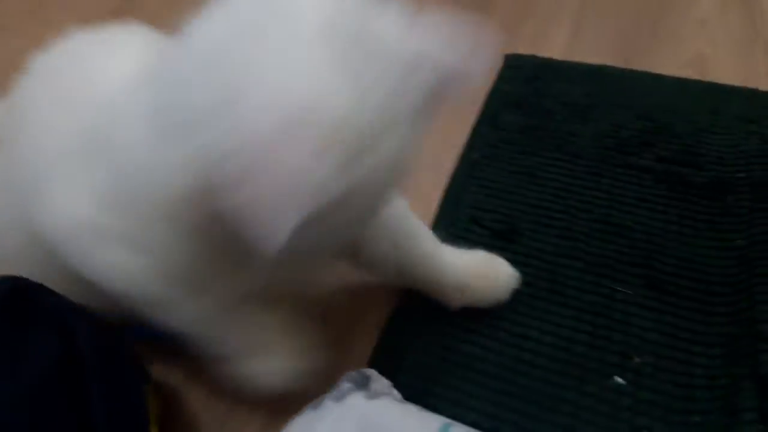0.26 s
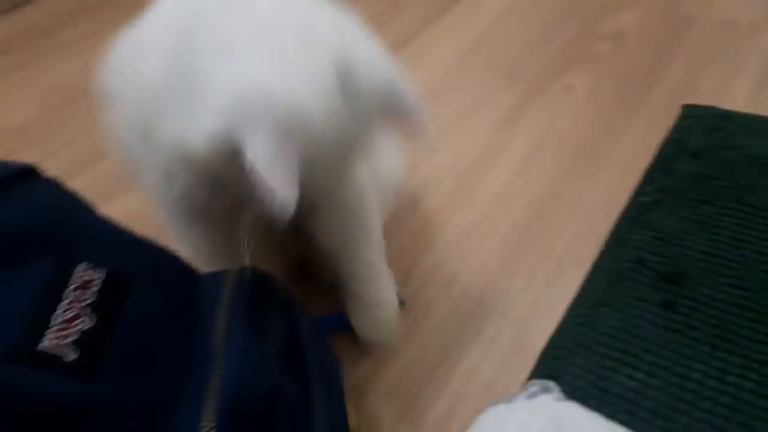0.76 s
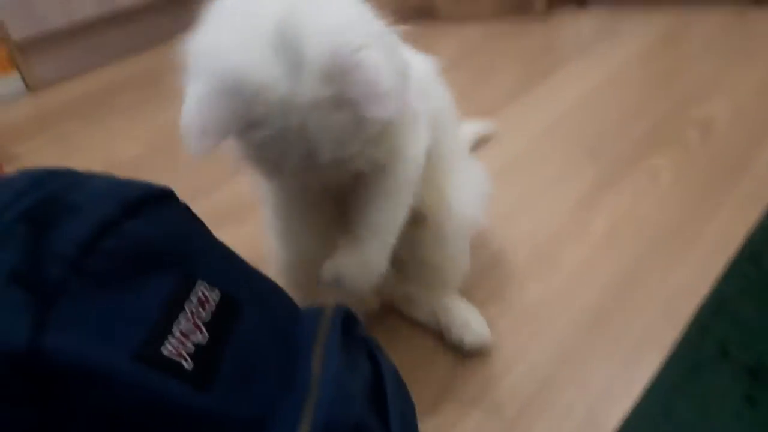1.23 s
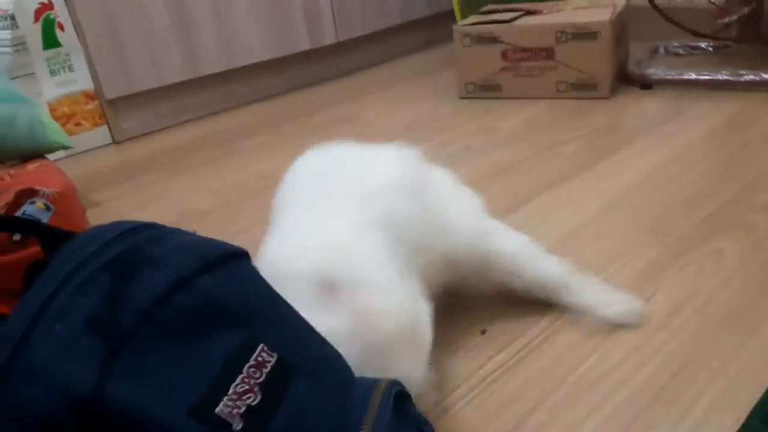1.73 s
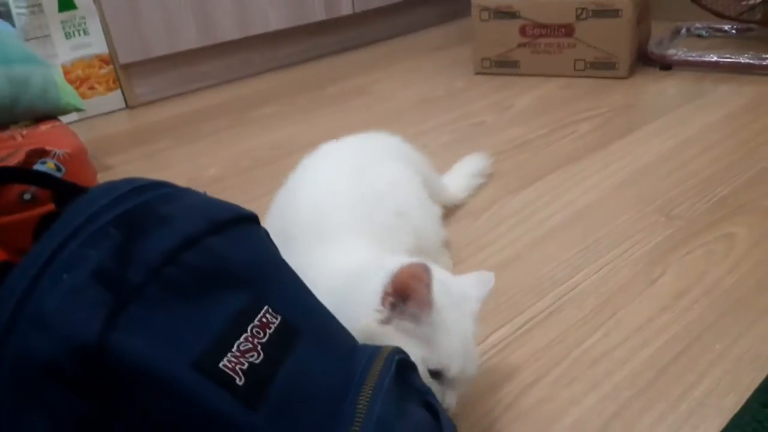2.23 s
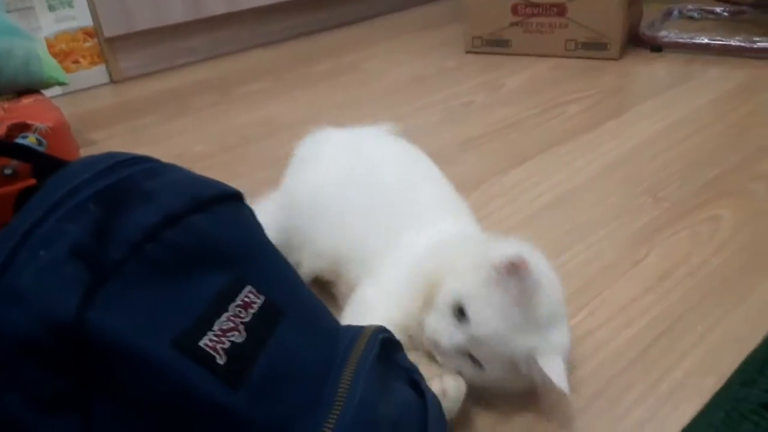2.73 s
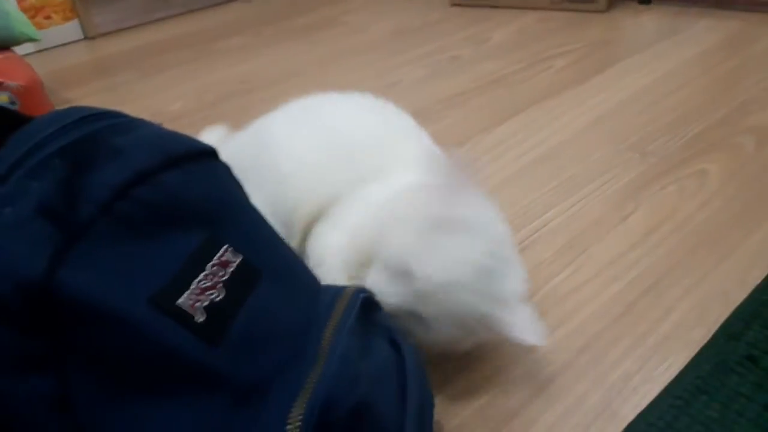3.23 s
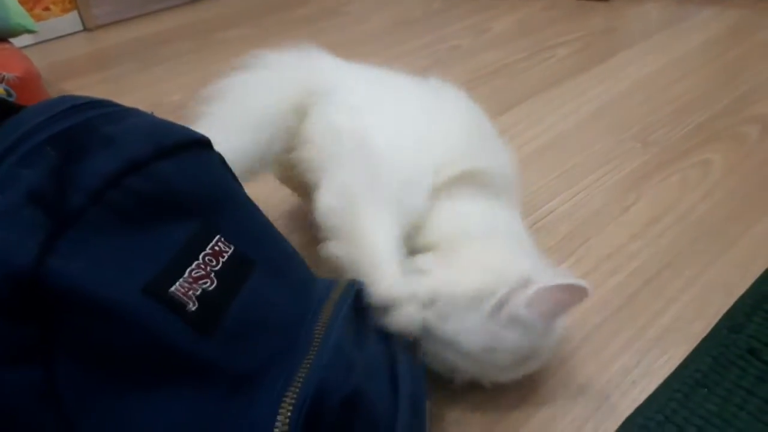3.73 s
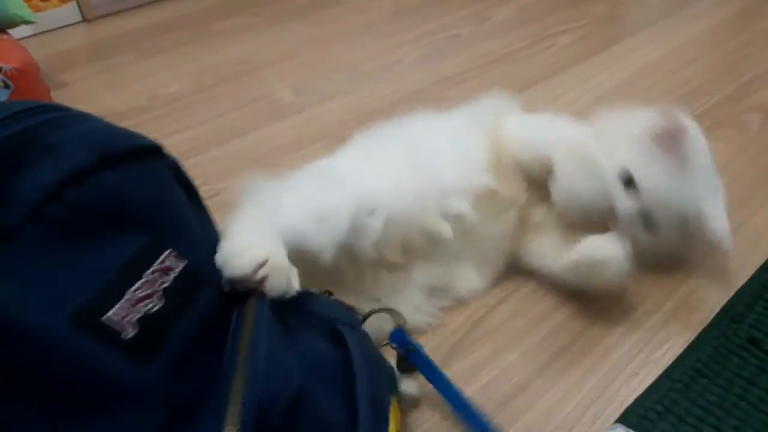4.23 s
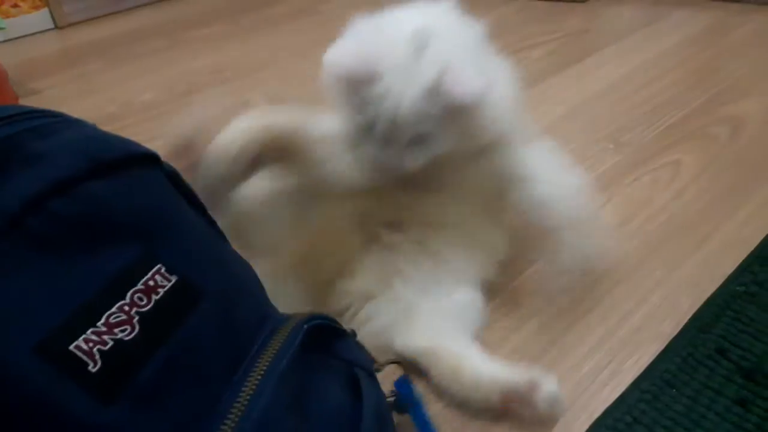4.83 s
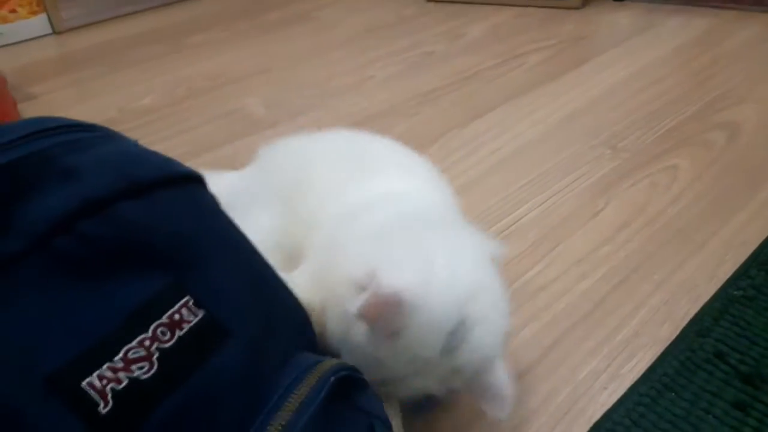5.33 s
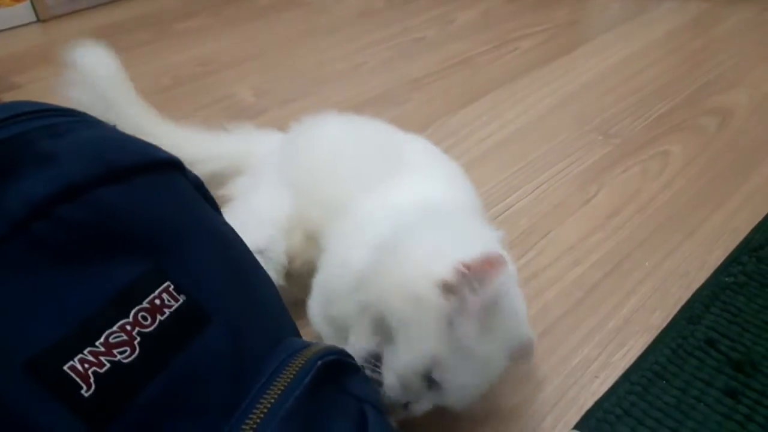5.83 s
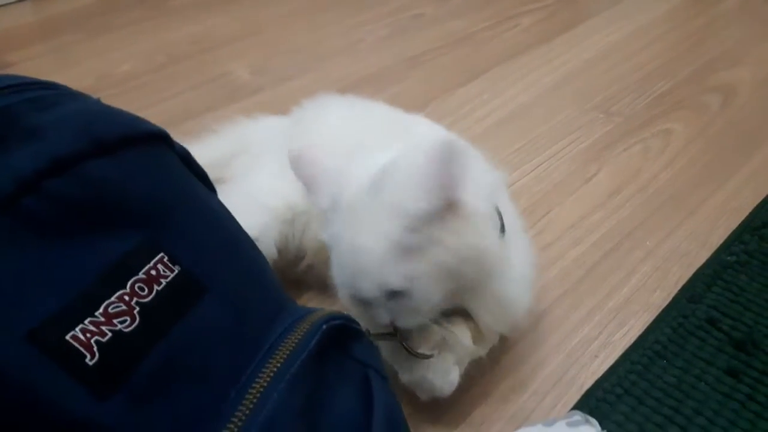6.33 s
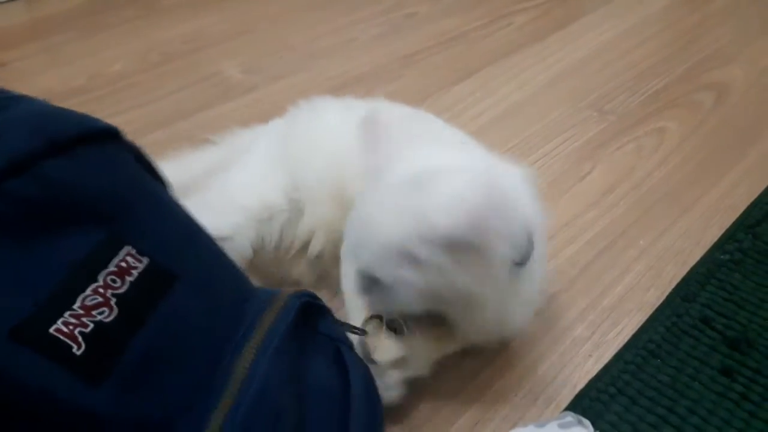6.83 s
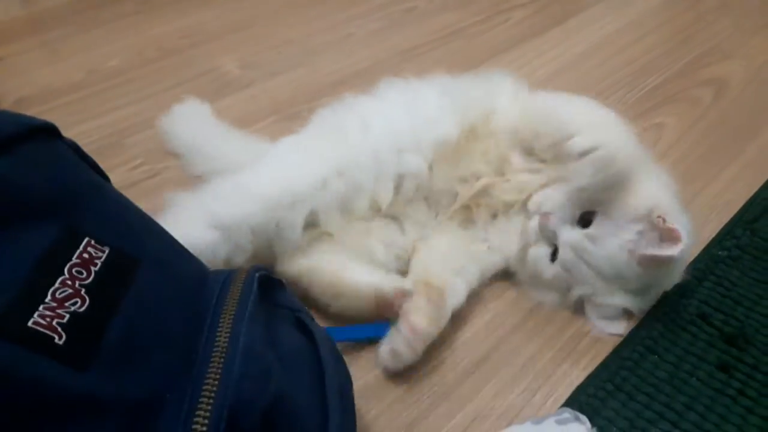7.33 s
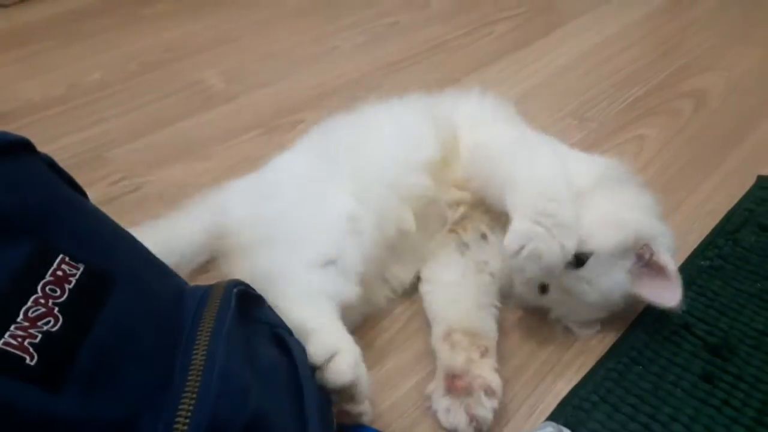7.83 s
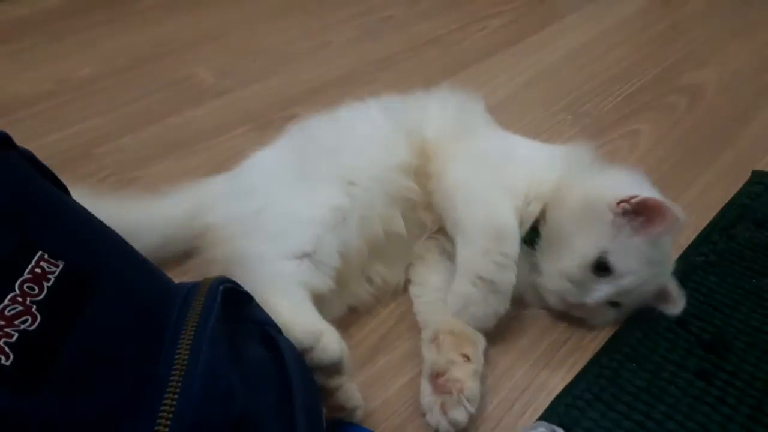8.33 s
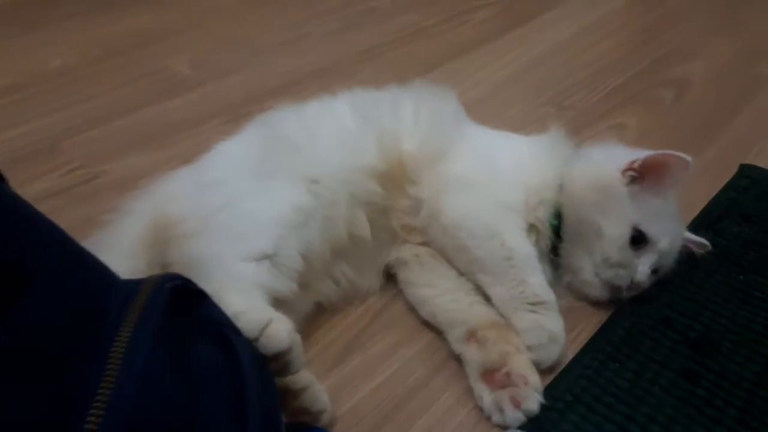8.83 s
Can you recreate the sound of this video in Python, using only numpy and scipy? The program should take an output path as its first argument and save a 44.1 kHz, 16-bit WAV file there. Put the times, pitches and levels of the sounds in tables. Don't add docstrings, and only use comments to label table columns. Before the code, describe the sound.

Close phone pickup in a small furnished room: a low humming appliance and faint hiss, then a kitten's thin, bright bell rattling irregularly. Claws tick and snag in fabric, a metal clasp clinks, fur scuffs and paws slide and thump the boards. Busy scrambles alternate with calm gaps; the loudest is a woody clack before three seconds. Two firm knocks follow the final loud jingle, then it settles.

```python
import sys
import numpy as np
from scipy import signal
from scipy.fft import rfft, irfft, next_fast_len
from scipy.io import wavfile
from scipy.ndimage import uniform_filter1d

SR = 44100
rng = np.random.default_rng(int(sys.argv[2]) if len(sys.argv) > 2 else 0)


def volts_from_db(level):
    exponent = np.asarray(level, float) / 20
    return 10 ** exponent


def persist_wave(psi):
    counts = np.round(np.clip(psi, -1, 1) * 32767).astype(np.int16)
    wavfile.write(sys.argv[1], SR, np.atleast_2d(counts).T)


N = 399987


def bell():
    # start in seconds, peak in dB, upper partials in relative dB, tick in relative dB.
    blows = [(0.7456, -50, -18, 8), (0.7979, -42.5, -15, 3.5), (0.901, -46, -11, 3),
             (1.068, -44, -22, -19.5), (1.158, -39, -19, -15), (1.1613, -49, -21.5, -15),
             (1.2785, -35, -15.5, -8), (1.468, -39.5, -28, -13), (1.5925, -40.5, -14, -16),
             (1.794, -41.5, -36, 4), (1.832, -40.5, -11.5, 5), (1.909, -31.5, -25, -1.5),
             (2.5846, -52, -6, -6), (2.6444, -48.5, -18, -11), (2.7924, -31, -14.5, -14),
             (3.3008, -50, -9, -0.5), (4.4171, -51, -8, -15.5), (4.712, -51, -18, -14),
             (4.861, -39.5, -9.5, -7), (5.0794, -23.5, -15, -9), (5.2764, -45, -20, 3),
             (5.3437, -33, -15, -11), (5.5627, -38.5, -29.5, -21), (5.6575, -42.5, -15, -11),
             (5.7916, -38, -13.5, -2), (5.9244, -36.5, -28, -3), (6.2981, -42.5, -20, -15.5),
             (6.4604, -48.5, -31.5, -16.5), (7.042, -35.5, -6, -7), (7.104, -43, -20, -16),
             (7.1074, -20, -20, -16), (7.871, -59.5, 1, 4)]
    # start in seconds, peak in dB.
    rebounds = [(0.6535, -58), (0.724, -57), (0.732, -50.5), (0.779, -53), (0.886, -56), (0.929, -49),
                (0.9634, -54), (1.1019, -47), (1.26, -49), (1.312, -47.5), (1.3428, -47), (1.371, -42),
                (1.4134, -43), (1.432, -54), (1.4872, -43), (1.51, -56.5), (1.5678, -47), (1.7379, -61),
                (2.6994, -69), (2.7609, -54.5), (3.094, -53), (3.2147, -54), (3.24, -51.5), (3.317, -46),
                (3.3455, -50.5), (4.119, -54), (4.2483, -47), (4.3889, -54.5), (4.6369, -55), (4.6995, -50),
                (4.8413, -54), (5.0027, -42), (5.12, -49), (5.267, -46.5), (5.313, -53), (5.2963, -40),
                (5.5476, -51), (5.5747, -46.5), (5.613, -48), (5.6254, -46), (5.6446, -46.5), (5.7063, -56),
                (5.7836, -49), (5.855, -59), (5.884, -58), (5.9509, -44.5), (5.9909, -50.5), (6.2106, -57),
                (6.9671, -53), (6.985, -54), (7.0753, -44), (7.219, -39), (7.269, -56), (7.34, -58)]
    # start in seconds, peak in dB.
    glances = [(0.7342, -59), (0.8044, -63), (1.1792, -42), (1.5284, -45), (1.5878, -54.5), (2.7921, -53),
               (3.3174, -51.5), (3.3844, -52), (4.8424, -49), (4.8594, -46), (5.0844, -40), (5.2794, -52),
               (5.2974, -46.5), (5.6644, -59), (5.8044, -59), (5.9244, -60.5), (5.9499, -49),
               (5.9914, -66.5), (7.0414, -51), (7.0614, -54), (7.1048, -37), (7.3038, -40.5),
               (7.855, -51.5), (7.8694, -61)]
    # start in seconds, length in seconds, blow level in dB, tick in relative dB.
    shakes = [(0.64, 0.016, -66, 16), (0.73, 0.079, -62.5, 36), (0.872, 0.035, -57, 20),
              (0.984, 0.32, -51, -12), (1.28, 0.147, -50, -16), (1.473, 0.138, -42.5, -16),
              (1.651, 0.46, -46.5, -8), (2.58, 0.26, -48, 9.5), (3.087, 0.054, -51, -15.5),
              (3.207, 0.18, -56.5, -8.5), (4.1, 0.059, -50, -4), (4.24, 0.043, -53.5, -8),
              (4.297, 0.25, -59, -4), (4.625, 0.18, -51, -1), (4.84, 0.053, -36.5, -12.5),
              (5.014, 0.032, -49, -10), (5.266, 0.059, -36, -6), (5.543, 0.091, -56, -19),
              (5.685, 0.035, -61, 9), (5.804, 0.062, -62, -8.5), (5.936, 0.046, -68.5, 0),
              (6.177, 0.045, -51, 0), (6.481, 0.062, -57, -5.5), (6.982, 0.18, -40, -15),
              (7.205, 0.022, -59, -5), (7.264, 0.105, -60, -16), (7.702, 0.033, -50.5, -14),
              (7.842, 0.058, -49.5, -13.5)]
    # frequency in Hz, level in dB, t60 in seconds.
    shell_modes = [(4750, -9, 0.027), (4763, -2.5, 0.045), (4817, -7, 0.025), (5040, -12, 0.016)]
    # frequency in Hz, level in dB, t60 in seconds.
    rim_modes = [(11285, 1.5, 0.06), (11530, 2, 0.055)]
    # frequency in Hz, level in dB, t60 in seconds.
    pellet_modes = [(5144, 4, 0.0029), (6413, 7, 0.0045), (7090, -3.5, 0.0033)]
    rebound_rim_db, rebound_tick_db = -24.5, -10.5
    tumbles_per_s, tumble_spread_db, tumble_rim_db, roll_db = 4, -7, -19, -5
    bounce_fade_s, bounces_per_s = 0.012, 450
    slit_waver_hz, slit_hz = 55, 4300

    light_blows = [(s, db, rebound_rim_db, rebound_tick_db) for s, db in rebounds]
    s, db, rim_db, tick_db = np.transpose(blows + light_blows)
    trains = np.zeros((4, N))
    trains[:, np.round(s * SR).astype(int)] = volts_from_db(db + np.array([0 * db, tick_db + 0.5, rim_db, rim_db - 9]))
    s, db = np.transpose(glances)
    trains[3, np.round(s * SR).astype(int)] = volts_from_db(db - 1.5)

    start, hold, shake_db, dry_db = np.transpose(shakes)
    shaken = spells(start, hold, shake_db, 900, 500)
    ticking = spells(start, hold, shake_db + dry_db, 900, 500)
    luck_db = tumble_spread_db * np.clip(rng.standard_normal((4, N)), -2, 2)
    tumbles = rng.random(N) < tumbles_per_s / SR
    rim_shaken = shaken + tumble_rim_db
    trains = trains + volts_from_db(np.array([shaken, ticking, rim_shaken, rim_shaken]) + luck_db) * tumbles

    unrest = signal.lfilter([1], [1, -np.exp(-1 / (bounce_fade_s * SR))], trains)
    unrest[0] += volts_from_db(shaken + roll_db)
    bounces = rng.standard_normal(trains.shape) * (rng.random(N) < bounces_per_s / SR)
    trains = trains + volts_from_db(-11.5) * unrest * bounces

    bodies = [shell_modes, pellet_modes, rim_modes[:1], rim_modes[1:]]
    shell, tick, *rims = (signal.oaconvolve(train, ring(body))[:N] for train, body in zip(trains, bodies))

    cover = wander(1500)
    bend = np.exp(2j * np.pi * np.cumsum(slit_waver_hz * cover) / SR)
    shell, rim = (signal.hilbert(note, next_fast_len(N))[:N] for note in (shell, sum(rims)))
    rings = (shell * bend + rim * bend ** 2).real + tick
    rings = rings * volts_from_db(3.2 * np.clip(wander(200), -3, 1) - 1)
    return above(rings, slit_hz, order=8)


def clasp():
    # start in seconds, peak in dB, frequency in Hz, t60 in seconds.
    clinks = [(1.069, -58, 9600, 0.095), (1.07, -58.5, 13200, .07), (1.098, -49, 13300, .07),
              (1.145, -23.5, 13400, 0.011), (1.17, -45, 7000, 0.06), (1.224, -32, 13200, .04),
              (1.232, -33, 13200, 0.065), (1.225, -41.5, 5770, 0.074), (1.254, -41, 13200, .07),
              (1.287, -36, 13300, .06), (1.288, -41, 10200, 0.033), (1.288, -35, 5900, 0.018),
              (1.342, -38, 9900, 0.027), (1.858, -65, 13400, .08), (2.757, -46.5, 5780, 0.053),
              (2.761, -47.5, 13200, 0.083), (4.396, -43.5, 10150, 0.028), (5.25, -58.5, 10100, 0.075),
              (5.564, -42.5, 1257, 0.052), (7.129, -48, 10070, 0.06), (7.129, -40, 3510, 0.023),
              (7.211, -41, 12900, 0.035), (7.222, -48, 3526, 0.023)]
    out = np.zeros(N)
    for s, db, hz, t60 in clinks:
        add(out, s, ring([(hz, db, t60), (hz * 0.994, db - 8.5, t60 * 0.7)]))
    return out


def claws(room):
    # start in seconds, peak in dB, centre in Hz.
    ticks = [(0.9732, -48.5, 13200), (1.144, -26.5, 13800), (1.2236, -44, 12700), (1.287, -24.5, 13300),
             (1.3707, -24, 11100), (1.395, -36, 13000), (1.4951, -36, 11400), (1.864, -24, 9000),
             (2.0113, -16, 9730), (2.5347, -40, 13700), (2.7568, -47.5, 5800), (2.851, -29.5, 13000),
             (2.885, -25, 13250), (3.3669, -31.5, 8900), (4.087, -38.5, 6300), (4.144, -37, 7950),
             (4.1807, -34, 15300), (4.2267, -27, 15400), (4.278, -33, 11300), (4.6165, -39, 8500),
             (4.7554, -42, 11350), (5.024, -29.5, 15000), (5.589, -46, 8230), (7.3252, -44.5, 7000),
             (6.2112, -40.5, 4470), (7.1, -30.5, 11470), (7.2203, -29.5, 13100), (7.2523, -23.5, 15600),
             (7.2974, -36, 5160), (7.489, -35, 12600)]
    # start in seconds, peak in dB, centre in Hz.
    snags = [(0.9264, -40, 11200), (0.9544, -59, 7220), (0.979, -37, 13700), (1.0001, -42, 12600),
             (1.1267, -30, 13300), (1.1677, -21.5, 13000), (1.2524, -32, 12950), (1.3409, -28, 13400),
             (1.4729, -36.5, 11300), (1.5214, -39.5, 11500), (1.547, -32, 11500), (1.5864, -42, 11590),
             (1.8101, -32.5, 6750), (3.3834, -50, 12900), (3.47, -50.5, 5500), (3.941, -38, 13490),
             (3.9516, -40, 12100), (3.9675, -37, 13030), (4.0083, -53, 14000), (4.0228, -42, 12700),
             (4.0262, -38, 11400), (4.0834, -33, 6610), (4.1001, -35, 5950), (4.1066, -34, 7700),
             (4.1924, -36, 13900), (4.2394, -25, 15700), (4.2511, -35.5, 11300), (4.3113, -32, 7560),
             (4.3184, -38.5, 7760), (4.3291, -32, 8000), (4.4404, -44, 6230), (4.4742, -43, 7520),
             (4.498, -43, 7620), (4.7904, -36, 15540), (4.8285, -50, 11500), (4.9392, -37.5, 15600),
             (5.0085, -49, 11600), (5.0315, -26, 15800), (5.239, -35, 5990), (5.4037, -30.5, 5860),
             (5.443, -29.5, 13500), (5.5632, -36, 5890), (5.7119, -37, 8300), (5.731, -44, 8420),
             (5.7454, -47, 12700), (6.2394, -57, 6980), (7.0374, -44.5, 11300), (7.0573, -34.5, 6810),
             (7.0626, -41, 11100), (7.085, -35, 11300), (7.211, -43.5, 13250), (7.305, -31.5, 11500),
             (7.3314, -33, 11500), (7.436, -44.5, 5740), (7.552, -41, 7530), (7.5946, -45, 6210)]
    snag_db = -6
    direct, spread = np.zeros(N), np.zeros(N)
    for s, db, hz in ticks + [(s, db + snag_db, hz) for s, db, hz in snags]:
        shape = causal([(hz / 6, -26), (hz / 6.6, -10), (hz, 0), (hz * 2, -6), (hz * 4, -20)], size=256)
        add(direct, s, volts_from_db(db + 4) * ragged(shape, 0.004))
        add(spread, s, volts_from_db(1.283 * db + 12.5) * shape)
    return direct + signal.fftconvolve(spread, room)[:N]


def strap(room):
    # start in seconds, peak in dB, frequency in Hz.
    taps = [(1.1342, -40, 1730), (1.1432, -42.5, 3090), (1.2232, -47.5, 3010), (1.2791, -46, 3280),
            (1.3698, -32, 1730), (1.3694, -38, 4070), (1.393, -50, 3530), (1.4721, -45, 3000),
            (1.522, -42, 2990), (1.5435, -36, 1410), (2.868, -8, 4113), (2.892, -17, 4200),
            (4.1892, -38, 1470), (4.2762, -43, 1270), (4.3097, -39, 1220), (4.8886, -48, 2450),
            (5.143, -27.5, 3330), (5.1635, -42, 3550), (5.253, -39, 3660), (7.295, -39.5, 3900),
            (7.3251, -34, 3130), (7.877, -58, 2970)]
    out = np.zeros(N)
    for s, db, hz in taps:
        note = ring([(hz, 0, 0.005)], size=600, rise_s=0.00043)
        add(out, s, volts_from_db(db) * ragged(note, 0.004))
    return out + volts_from_db(-7) * signal.fftconvolve(out, room)[:N]


def knocks():
    # start in seconds, peak in dB, board note in Hz, crack in relative dB,
    # room in dB.
    blows = [(1.168, -36, 939, -16.5, -5), (1.279, -36, 434, -16, 6), (1.317, -14.5, 668.7, -19, -3.5),
             (1.428, -38.5, 483, -17.5, 8), (1.442, -35, 523.5, -32.5, -1.5), (1.502, -41, 520, -10.5, 4),
             (1.651, -49, 483, -21, 2), (1.699, -35, 520, -35, -5), (2.01, -69, 733, 2, 36.5),
             (2.862, -10, 550, 2.5, -3), (2.8735, -14, 670, -4, 1.5), (3.368, -43, 843, -22, -11),
             (4.189, -36, 328, -8.5, 0.5), (4.284, -34, 535, -17, 1), (4.33, -32.5, 254, -10, -0.5),
             (4.999, -38, 272.4, -15, -2), (5.142, -34.5, 510, -11, -10), (5.181, -26.5, 545, -3, -1.5),
             (5.2512, -31, 313, -19, -7), (5.374, -19, 537, -0.5, 0.5), (5.419, -22, 574, -10.5, 6),
             (7.097, -44.5, 480, -26, -6), (7.4123, -19, 560, 1, -1.5), (7.571, -16.5, 575.3, -6, 0.5)]
    # start in seconds, peak in dB, board note in Hz,
    # crack in relative dB.
    bounces = [(1.662, -44, 490, -29), (1.72, -46, 514, -19), (1.805, -56, 576, -38), (1.83, -49, 513, -36),
               (1.84, -44, 524, -33), (1.867, -44, 553, -25), (1.876, -42, 506, -32),
               (1.897, -46, 604, -33), (1.908, -39, 610, -27.5), (1.922, -40, 556, -23),
               (2.89, -15, 825, -12), (2.897, -30, 610, -5), (4.309, -50, 500, 2), (5.383, -32, 590, -21),
               (5.397, -24, 690, -4.5), (5.434, -27, 560, -13), (7.22, -41.5, 850, -8),
               (7.531, -42, 560, -22), (7.5888, -25, 632, -5), (7.5986, -28, 576, 4), (7.611, -26, 613, -8),
               (7.618, -27, 563, -7)]
    # ratio to the board note, level in dB, t60 in seconds.
    board = [(.62, -28, 0.011), (1.001, 11.5, 0.01), (1.33, 5, 0.011), (1.56, 1.5, 0.0067),
             (2.3, -5.5, 0.019)]
    # frequency in Hz, level in dB.
    crack_colour = [(700, -24), (1100, -7.5), (1800, -0.5), (4500, 1.5), (5400, -15), (9000, -26.5),
                    (16000, -42.5)]
    # frequency in Hz, level in dB.
    cabinet_modes = [(513, -3.5), (690, -4), (795, -0.5), (873, -3), (958, -2.5), (1295, -7), (2200, -8),
                     (3030, -5.5), (3550, -5.5), (3815, -7.5), (4140, -5.5)]
    cabinet_db, cabinet_t60_s = -17.5, 0.17
    out, crack, snap = np.zeros(N), causal(crack_colour), np.hanning(15)
    cabinet = ring([(hz, db + cabinet_db, cabinet_t60_s) for hz, db in cabinet_modes], rise_s=0.0045)
    for s, db, hz, crack_db, *room_db in blows + bounces:
        contact_s = np.clip(-crack_db * 0.00009, 0.0004, 0.005)
        softness = max(contact_s, 0.001) / 0.001
        modes = [(hz * ratio, level_db * softness - 5.5, t60) for ratio, level_db, t60 in board]
        note = ring(modes, size=3000, rise_s=contact_s)
        add(out, s + 0.0019, volts_from_db(db) * note)
        add(out, s + 0.0015, -volts_from_db(db + crack_db + 11) * snap)
        add(out, s + 0.00083, volts_from_db(db + crack_db + 3) * crack)
        add(out, s + 0.0058, volts_from_db(db + crack_db - 4) * ragged(crack, 0.009))
        add(note, 0, volts_from_db(crack_db + 13) * crack)
        if room_db:
            add(out, s + 0.0022, volts_from_db(db + crack_db) * cabinet)
            add(out, s + 0.0016, volts_from_db(db + room_db[0]) * signal.fftconvolve(note, tail()))
    return above(out, 270, order=3)


def contacts():
    # start in seconds, hold in seconds, effort in dB,
    # fur on cloth in relative dB.
    efforts = [(0.227, 0.157, -64, -8), (0.439, 0.0196, -59.5, -4.5), (0.696, 0.12, -64.5, -4.5),
               (0.973, 0.1, -62, 1.5), (1.101, 0.052, -53, -1), (1.226, 0.068, -55, 2),
               (1.342, 0.046, -52.5, 2.5), (1.461, 0.092, -53.5, -4.5), (1.622, 0.1, -59, -7),
               (1.831, 0.082, -46.5, -8), (2.335, 0.13, -66, -8), (2.542, 0.057, -59, -8),
               (2.76, 0.13, -56.5, -1.5), (3.185, 0.22, -60.5, -22), (3.989, .13, -59.5, -1),
               (4.18, 0.16, -54.5, -8), (4.395, 0.0702, -54, -9.5), (4.591, 0.31, -60, -3),
               (5.028, 0.043, -55, -2.5), (5.14, 0.037, -48.5, -19), (5.269, 0.36, -58.5, -9.5),
               (5.742, .04, -61, -0.5), (6.214, 0.41, -64.5, -10.5), (6.883, 0.16, -52, -24),
               (7.064, 0.0633, -54.5, -9), (7.228, 0.0976, -54, -21), (7.332, .05, -60.5, 0),
               (7.485, .02, -63, 5), (7.564, 0.0421, -50.5, -19.5), (7.86, 0.034, -62, -8.5)]
    # start in seconds, hold in seconds, level in dB.
    slides = [(1.025, .08, -69.5), (1.145, 0.25, -60.5), (1.508, 0.1, -62), (1.668, 0.143, -61.5),
              (1.829, 0.1048, -53.5), (2.335, 0.102, -73.5), (2.544, 0.18, -69.5), (3.298, 0.075, -74),
              (3.958, 0.11, -64), (4.184, 0.31, -61.5), (4.604, 0.37, -69.5), (5.04, 0.12, -63),
              (5.435, 0.15, -63.5), (6.237, 0.024, -66.5), (6.917, 0.18, -60), (7.058, 0.28, -64.5)]
    # body, paws and fur, in dB.
    resting = (-68, -82.5, -84.5)
    swell_db_per_s, settle_db_per_s = 168.5, 169.5
    start, hold, effort_db, fur_db = np.transpose(efforts)
    moves = [(start, hold, effort_db), np.transpose(slides), (start, hold, effort_db + fur_db)]
    return [np.maximum(spells(*move, swell_db_per_s, settle_db_per_s), rest_db)
            for move, rest_db in zip(moves, resting)]


def rubbing():
    # frequency in Hz, level in dB.
    body_colour = [(150, -26), (330, -5.5), (540, 0), (800, -7.5), (1500, -15), (2500, -28)]
    # frequency in Hz, level in dB.
    paw_colour = [(700, -24.5), (1500, -8.5), (3000, -5), (5000, -6.5), (8000, -10.5), (12000, -36)]
    # frequency in Hz, level in dB.
    fur_colour = [(3000, -21), (6000, 0.5), (9000, -8), (13000, 3.5), (16000, -1)]
    # colour, slips per second, slip spread in dB, stroke depth in dB, slips over hiss in dB.
    kinds = [(body_colour, 300, 3.0, 2.5, -2),
             (paw_colour, 550, 3.6, 1.8, 1),
             (fur_colour, 500, 3.2, 3.5, 4.5)]
    out = np.zeros(N)
    for level_db, (points, per_s, spread_db, stroke_db, slips_db) in zip(contacts(), kinds):
        sizes = volts_from_db(spread_db * np.minimum(rng.exponential(1, N), 3.4))
        slips = sizes * (rng.random(N) < per_s / SR) * rng.choice([-1., 1.], N)
        grip_db = np.clip(0.47 * (level_db - level_db.min() - 28.5), -12, 0)
        drive = volts_from_db(slips_db + grip_db) * evened(slips) + rng.standard_normal(N)
        out += evened(colour(drive, points)) * volts_from_db(level_db + stroke_db * wander(600))
    return out


def compressor():
    # multiple of the shaft, multiple of the buzz, peak in dB.
    lines = [(1, 0, -46), (2, 0, -45.5), (0, 1, -43), (3, 0, -65.5), (2, 1, -68), (0, 2, -64)]
    shaft_hz, buzz_hz = 58.692, 120.178
    turn = 2 * np.pi * np.arange(N) / SR
    return sum(volts_from_db(db) * np.cos((round(shaft) * shaft_hz + round(buzz) * buzz_hz) * turn + 2 * (shaft % 2))
               for shaft, buzz, db in lines)


def air():
    # frequency in Hz,
    # density in dB per Hz.
    air_colour = [(30, -42), (55, 0), (130, 4), (280, -1.5), (480, -21), (560, -29), (800, -9.5),
                  (1200, -39.5),
                  (2000, -32), (4400, -47.5), (8000, -49.5), (13500, -35.5), (16000, -39)]
    air_db, patch_db = -53, 1.5
    frames, hz = N // 256 + 5, np.fft.rfftfreq(1024, 1 / SR)
    a, b, patches = rng.standard_normal((frames, 513, 3)).T
    patches = uniform_filter1d(patches, 14, 0)
    patches = evened(uniform_filter1d(patches, 16, 1))
    z = (a + 1j * b) * volts_from_db(read(air_colour, hz)[:, None] + patch_db * patches)
    return volts_from_db(air_db) * evened(signal.istft(z, nperseg=1024, noverlap=768)[1][:N])


def tail(size=14336, onset_s=0.0015):
    # frequency in Hz, t60 in seconds.
    decay = [(250, 0.16), (700, 0.22), (2000, 0.245), (4500, 0.245), (12000, 0.25)]
    hz, t, z = signal.stft(rng.standard_normal(size), SR, nperseg=256)
    out = signal.istft(z * volts_from_db(-60 * t / read(decay, hz)[:, None]), SR, nperseg=256)[1][:size]
    out = out * np.clip(np.arange(size) / SR / onset_s, 0, 1)
    return out / np.linalg.norm(out)


def ring(modes, size=9000, rise_s=0.00053):
    t = np.arange(size) / SR
    swell = np.sin(np.pi / 2 * np.clip(t / rise_s, 0, 1)) ** 2
    return swell * sum(volts_from_db(db - 60 * t / max(t60, 0.002)) * np.sin(2 * np.pi * hz * t)
                       for hz, db, t60 in modes)


def causal(points, size=1024):
    log_gain = np.log(volts_from_db(read(points, abs(np.fft.fftfreq(size, 1 / SR)))))
    click = np.fft.ifft(np.exp(np.conj(signal.hilbert(log_gain)))).real[:size // 2]
    return click / abs(click).max()


def ragged(click, t60, size=256):
    burst = np.convolve(click, rng.standard_normal(size) * volts_from_db(-60 * np.arange(size) / SR / t60))
    return burst / abs(burst).max()


def spells(start, hold, db, rise_db_per_s, fall_db_per_s):
    t = np.arange(0, N + 64, 64)[:, None] / SR
    early, late = np.maximum(start - t, 0), np.maximum(t - start - hold, 0)
    level_db = db - rise_db_per_s * early - fall_db_per_s * late
    return np.interp(np.arange(N) / SR, t[:, 0], level_db.max(axis=1))


def wander(size):
    return evened(uniform_filter1d(uniform_filter1d(rng.standard_normal(N), size), size))


def evened(x):
    return x / np.sqrt(np.mean(x ** 2) + 1e-20)


def read(points, hz):
    f, value = np.transpose(points)
    return np.interp(np.log(hz + 1), np.log(f + 1), value)


def colour(x, points):
    size = next_fast_len(len(x))
    gain = volts_from_db(read(points, np.fft.rfftfreq(size, 1 / SR)))
    return irfft(rfft(x, size) * gain, size)[:len(x)]


def above(x, hz, order=4):
    return signal.sosfilt(signal.butter(order, hz, "high", fs=SR, output="sos"), x)


def add(mix, s, sound):
    part = mix[round(s * SR):][:len(sound)]
    part += sound[:len(part)]


def scene():
    # frequency in Hz, side minus mid in dB.
    width = [(60, -52.5), (150, -55), (380, -24), (800, -25), (2380, -22.5), (8500, -29.5), (15000, -17)]
    metal, room = bell() + clasp(), tail()
    metal = metal + volts_from_db(-5) * signal.fftconvolve(metal, room)[:N]
    mid = metal + claws(room) + strap(room) + knocks() + rubbing() + air() + compressor()
    scatter = 0.073 * rng.standard_normal(16) - signal.unit_impulse(16)
    side = colour(signal.oaconvolve(mid, scatter)[:N], width)
    return np.array([mid + side, mid - side])


def band_limit(x):
    return signal.sosfilt(signal.butter(12, 17180, fs=SR, output="sos"), x)


def record(dry):
    edge_hz, top_hz, top_db, gate_db = 15850, 16900, -4, -56
    held = 1.15 * np.tanh(dry / 1.15)
    low_pass = signal.firwin(255, edge_hz, window=("kaiser", 5), fs=SR)
    kept = signal.oaconvolve(held, low_pass[None], "same")
    top = signal.oaconvolve(held - kept, signal.firwin(255, top_hz, fs=SR)[None], "same")
    power = top[0] ** 2
    usual = uniform_filter1d(power, size=2048)
    opened = uniform_filter1d(power, size=128) > volts_from_db(2 * gate_db) + 4 * usual
    gate = np.minimum(2 * uniform_filter1d(1. * opened, size=256), 1)
    return band_limit(kept + volts_from_db(top_db) * top * gate)


dry = scene()
out = record(dry)
persist_wave(out)
```